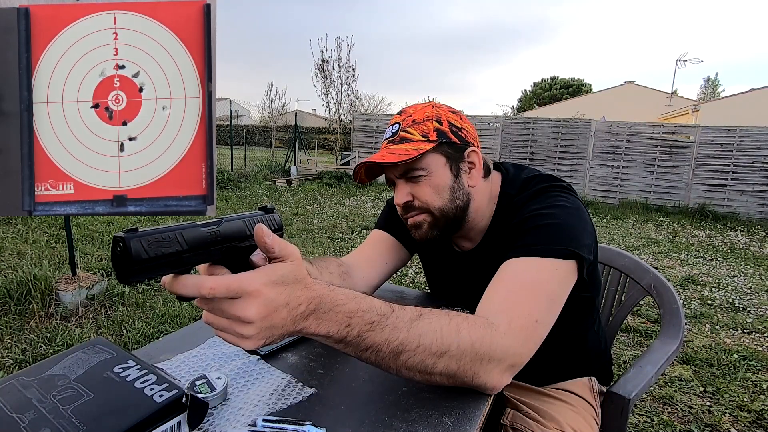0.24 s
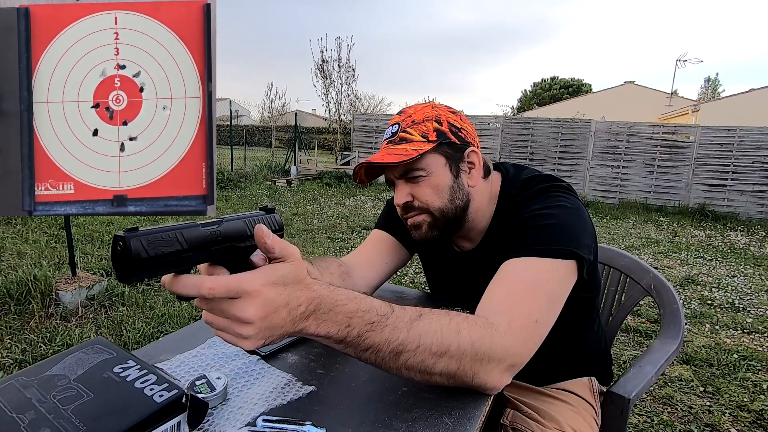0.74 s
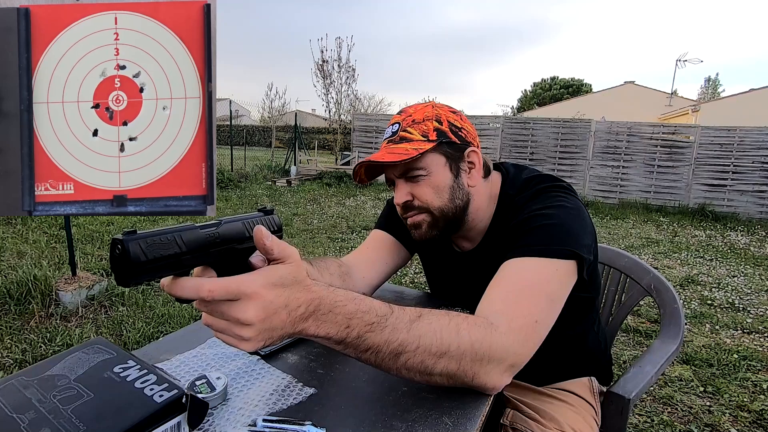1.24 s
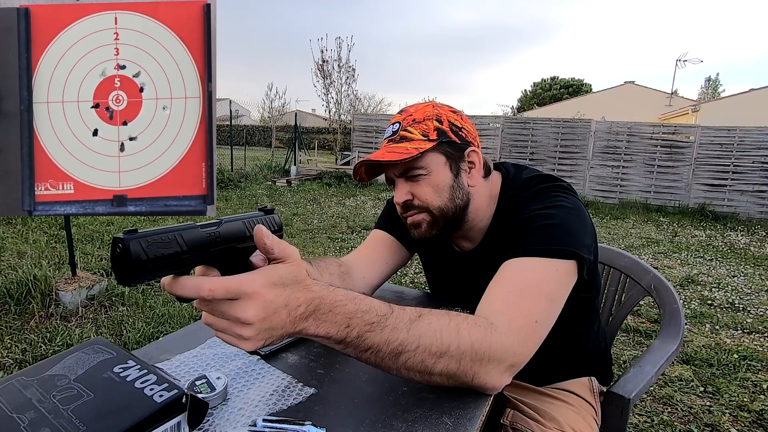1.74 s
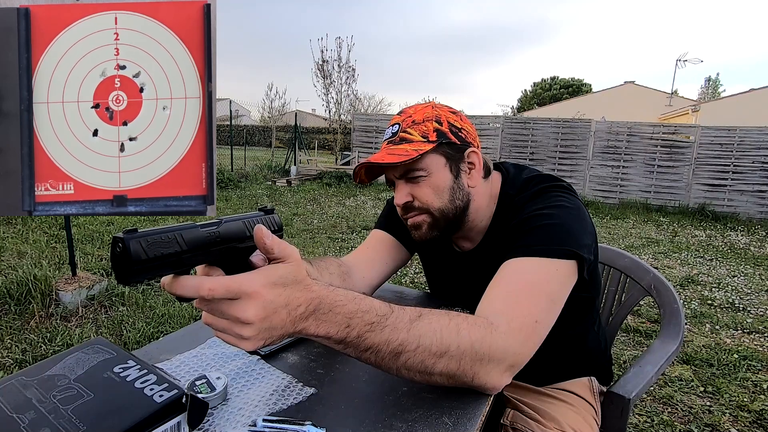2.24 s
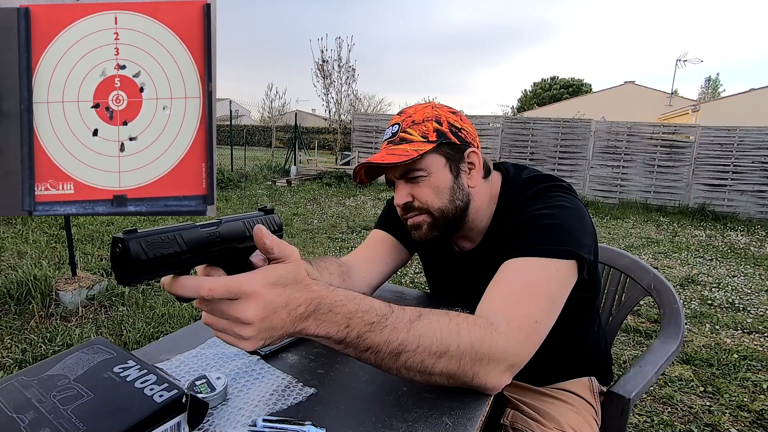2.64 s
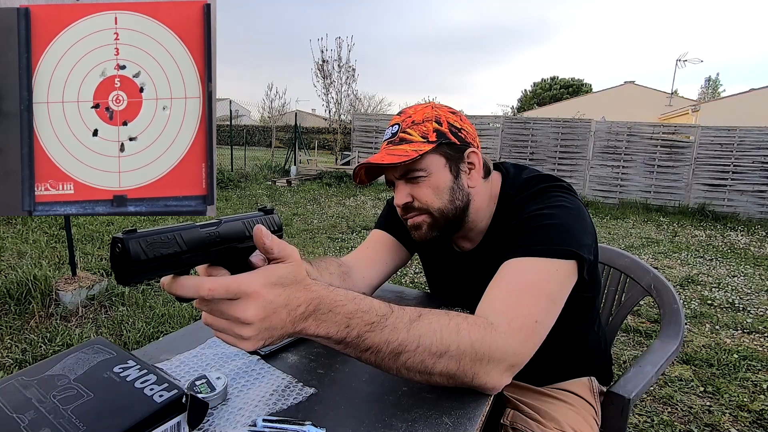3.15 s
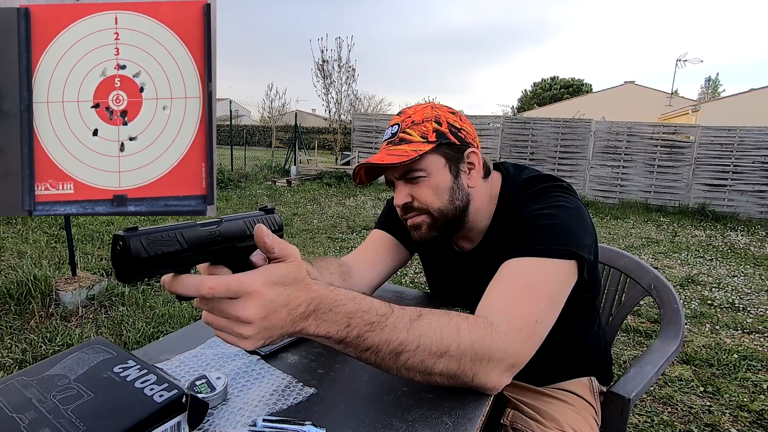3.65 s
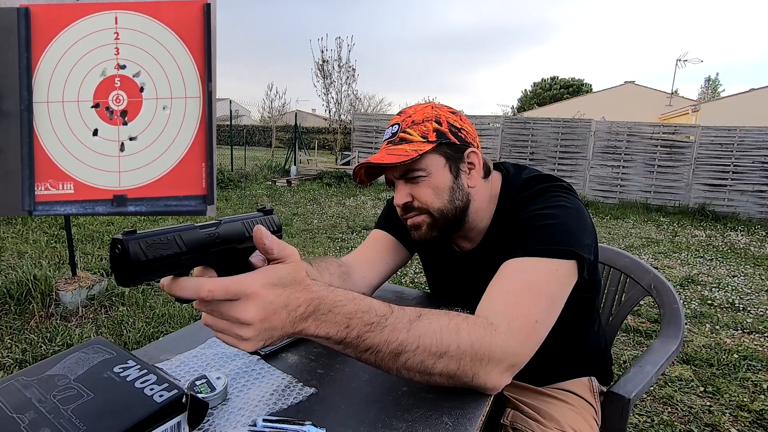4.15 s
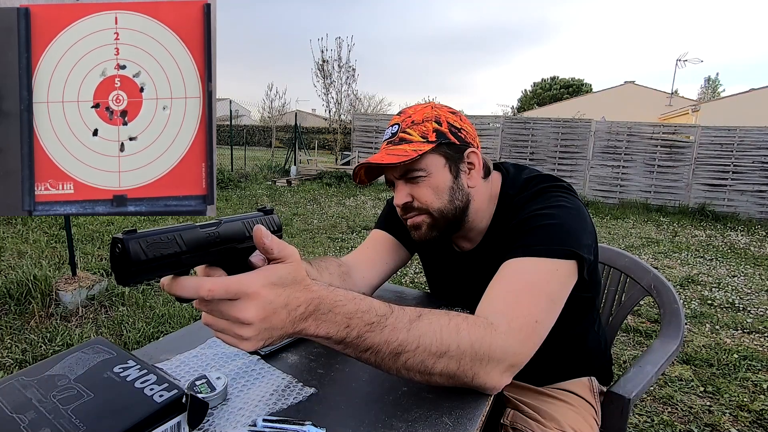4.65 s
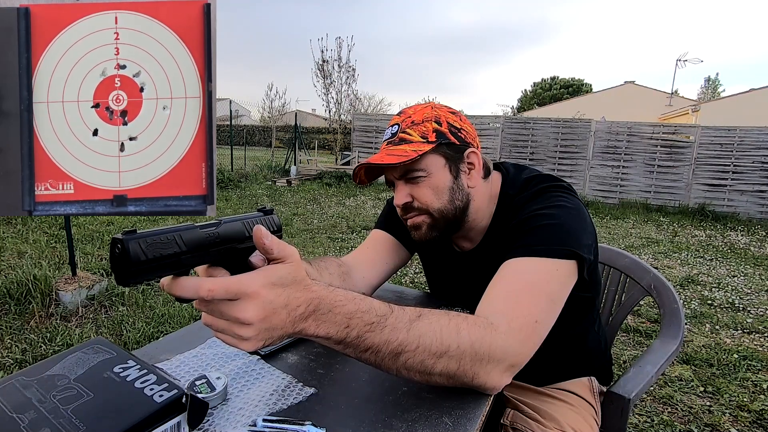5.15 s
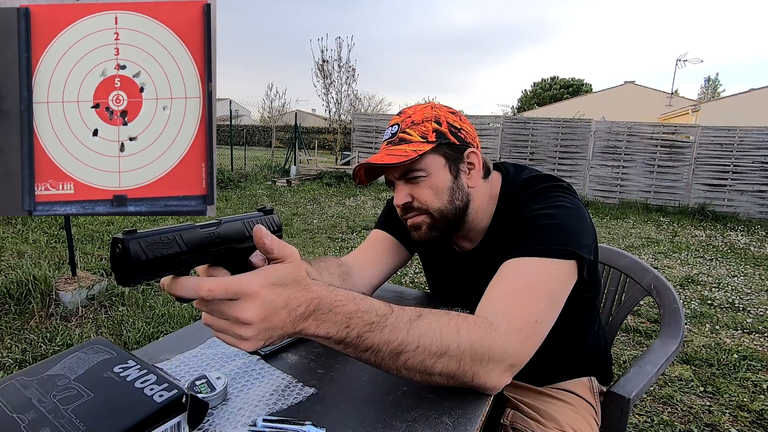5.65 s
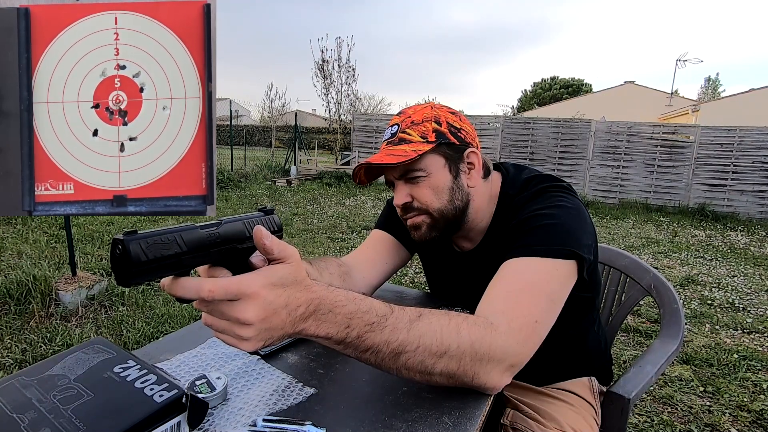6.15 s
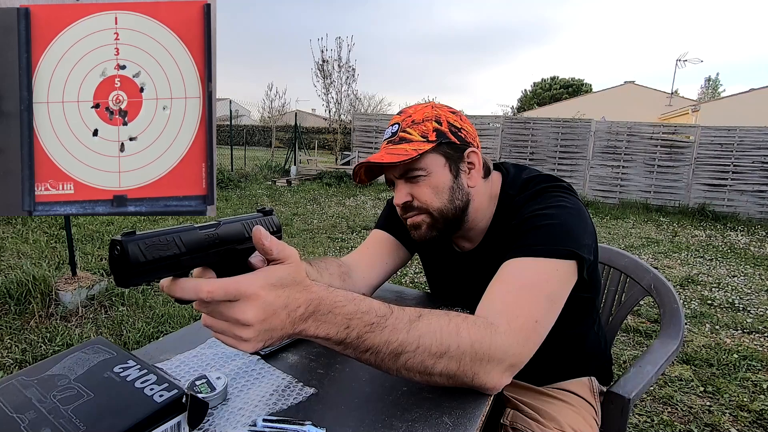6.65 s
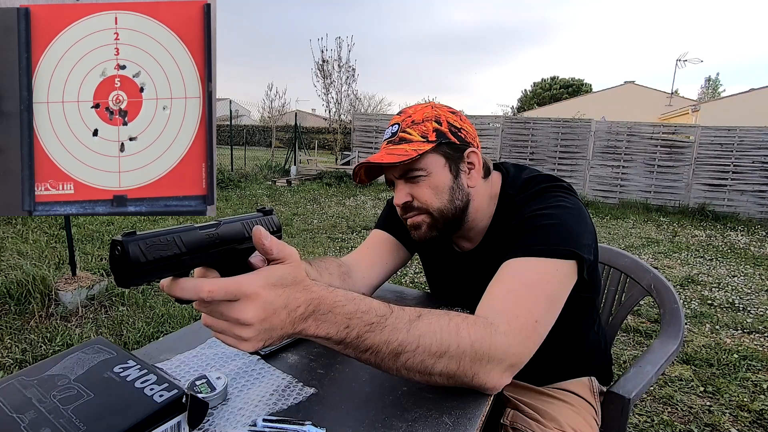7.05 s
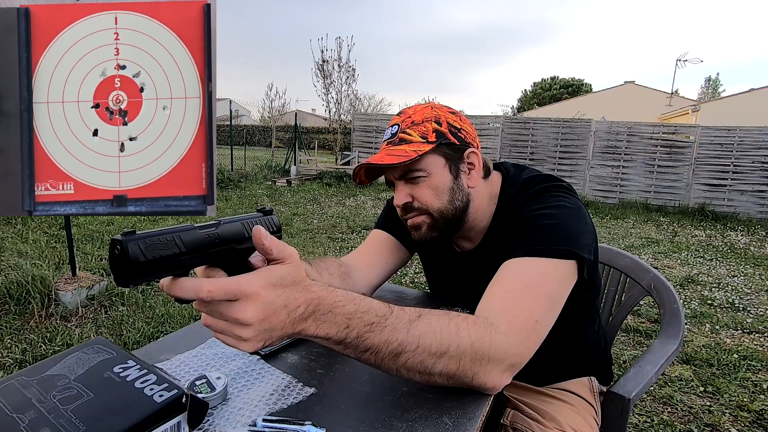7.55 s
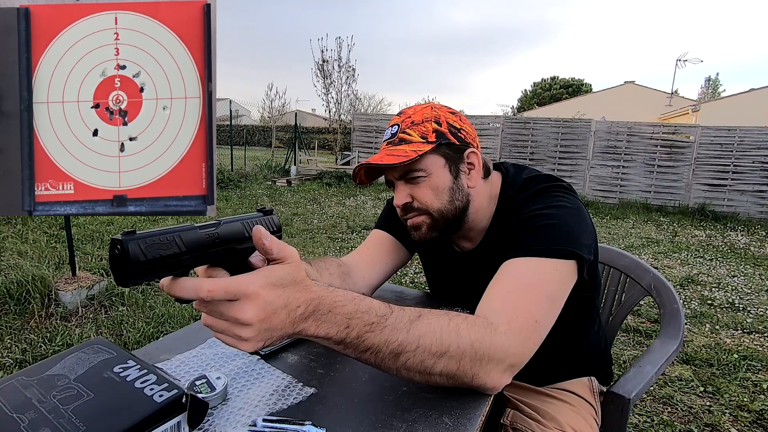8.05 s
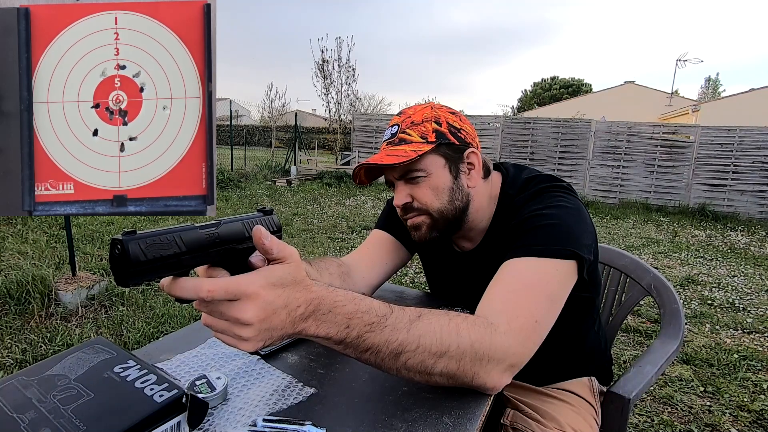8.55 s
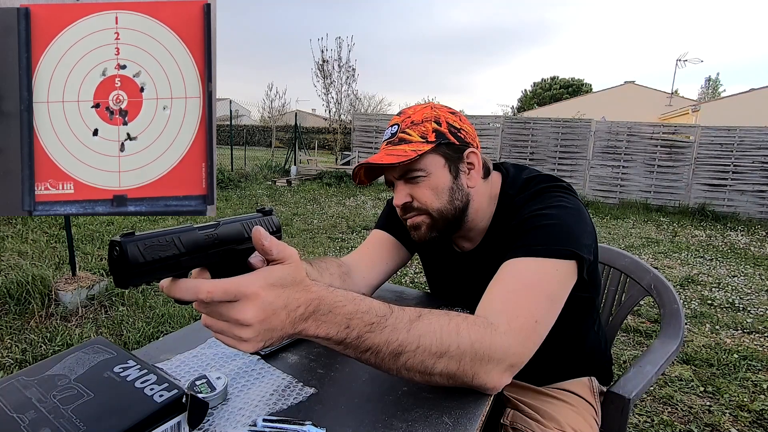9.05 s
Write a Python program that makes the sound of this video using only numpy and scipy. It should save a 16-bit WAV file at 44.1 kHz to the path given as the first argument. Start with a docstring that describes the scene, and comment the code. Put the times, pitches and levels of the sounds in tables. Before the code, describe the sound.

Close stereo microphone in an open garden. Low wind buffets at the start, then a gas pellet pistol fires four single shots about three seconds apart. Each is a hard, dry crack, followed at once by a short metallic ping from the target trap, a brief garden echo, and a bright steel trigger click. Dull ticks come between shots, over faint traffic and small birds.

```python
"""Wind on the microphone ports, far traffic and small birds lie under the whole scene: shaped noise, whistled glides.
Dull ticks of noise come as a trigger is taken up; four times a gas pistol then fires in an open garden.
Faint noise bursts and hiss, growing in 10 ms steps, come before each crack of suction spikes, gas noise and low push;
then the pellet sets the modes of a metal trap ringing, while banded noise swells and fades as the garden's return.
The trigger clicks back in bright steel modes, and a gain control ducks loud sounds and creeps back up."""
import sys
import numpy as np
from scipy import signal
from scipy.fft import rfft, irfft, next_fast_len
from scipy.io import wavfile
from scipy.ndimage import uniform_filter1d, minimum_filter1d

SR = 44100
rng = np.random.default_rng(int(sys.argv[2]) if len(sys.argv) > 2 else 0)


def output_pcm(signal):
    """Save a mono or channel-first signal as 16-bit PCM at the path in sys.argv[1].

    Samples are clipped to [-1, 1] before scaling.
    """
    pcm = np.clip(np.atleast_2d(signal).T, -1, 1) * 32767
    wavfile.write(sys.argv[1], SR, np.round(pcm).astype(np.int16))


def nominal_scale(level):
    """Amplitude ratio for a level in decibels (scalar or array-like)."""
    x = np.asarray(level, float) / 20
    return 10 ** x


N = 409688
TIME = np.arange(N) / SR
LEAD_S = .02   # short sounds begin this far into their buffer
SHORT_TIME = np.arange(4096) / SR - LEAD_S   # time in that buffer, zero at the start of the sound
LEAD, HALF_SECOND, HISS_SIZE, TAIL_SIZE = round(LEAD_S * SR), SR // 2, 2400, 33000   # lengths in samples

# The four shots. Each row: start of the crack in seconds, then the levels in dB of the low push, the early bursts,
# the hiss before the crack and the trap.
SHOTS = [(0.6542, -16.5, -13.5, -33, -25.5), (3.5945, -21.5, -8.5, -32, -24), (6.1055, -9, -18, -17.5, -21),
         (8.7847, -21.5, -7, -35, -22.5)]
# Spectrum of the crack. Each row: frequency in Hz, density in dB per Hz.
CRACK_SPECTRUM = [(180, -30.5), (300, -4.5), (688, -15), (1230, 1.5), (1690, -6), (2600, -7), (3280, 0),
                  (7280, -17), (9650, -14), (15900, -48)]
# Muzzle spike and its nearest reflections. Each row: time in seconds, level in dB.
CRACK_SPIKES = [(.0006, -1.5), (.0022, -4), (.0031, -5.5)]
# Returns of the crack from table, fence and walls. Each row: delay in seconds, level in dB.
ECHOES = [(.0100, -20.5), (0.0279, -26), (0.0335, -25), (.1780, -36)]
# Spectrum of the noise bursts and hiss before the crack. Each row: frequency in Hz, density in dB per Hz.
EARLY_BURST_SPECTRUM = [(150, -25), (330, 0.5), (800, -2.5), (1430, -13.5), (3120, -8.5), (4570, -17),
                        (5220, -8), (10100, -22.5), (15900, -43)]
# Thin tones in the hiss before the crack. Each row: frequency in Hz, level in dB.
HISS_TONES = [(800, 0.5), (1920, -5), (3050, -1), (4170, -7), (5300, -2), (5770, -5)]
# Modes of the metal trap. Each row: frequency in Hz, level in dB, time to fall 60 dB in seconds.
TRAP_MODES = [(526, -14, 0.23), (743, -14, 0.45), (1360, -10, 0.2), (1400, -16, .13), (2140, -18, 0.5),
              (3378, -10, 0.42), (3505, -9, 0.2), (4226, -3, 0.06), (4570, -4, 0.07), (4918, -18, .25),
              (6560, -14, 0.043)]
# Spectrum of the pellet's slap and the trigger's snap. Each row: frequency in Hz, density in dB per Hz.
SNAP_SPECTRUM = [(300, -45), (2800, -10.5), (3730, -11.5), (4420, 1), (5160, -15), (5750, -10),
                 (10500, -20), (15900, -43)]
# Spectrum of the garden's return. Each row: frequency in Hz, density in dB per Hz.
GARDEN_SPECTRUM = [(200, -17), (363, -40.5), (521, -9), (659, -13.5), (748, -8), (1150, -6.5), (3470, -7),
                   (9050, -23), (15000, -58)]
# Trigger springing back. Each row: start in seconds, level in dB, delay of its rebound in seconds.
RESETS = [(0.9249, -3, .0578), (3.8786, -3.5, .06), (6.425, -3, .0492), (9.1036, -2.5, .0545)]
# Modes of the trigger steel. Each row: frequency in Hz, level in dB, time to fall 60 dB in seconds.
STEEL_MODES = [(1050, -19, 0.045), (2800, -5, 0.05), (3623, -8, .04), (4500, 1, .032), (5850, -6, 0.035),
               (6632, -6, .04), (8350, -10, 0.028)]
# Spectrum of the rebound. Each row: frequency in Hz, density in dB per Hz.
REBOUND_SPECTRUM = [(900, -28), (2300, -5), (6000, 0), (14000, -24)]
# Trigger taken up. Each row: start in seconds, level in dB.
TICKS = [(0.016, -22.5), (1.346, -45), (3.231, -22), (4.203, -45), (4.681, -23.5), (4.96, -19),
         (6.745, -44), (6.889, -44.5), (7.293, -40), (7.304, -41), (7.901, -24)]
# Spectrum of the ticks in the frame. Each row: frequency in Hz, density in dB per Hz.
FRAME_SPECTRUM = [(130, -45), (280, -4), (613, -22), (1290, 1), (2170, -5.5), (2850, -2.5), (5550, -17.5),
                  (15000, -75)]
# Pistol and trigger at the two ports. Each row: frequency in Hz, left over right in dB.
NEAR_BALANCE = [(250, 0.5), (500, -3), (1500, 5), (4000, 1.5), (9000, -4)]
# Steep falling chirps. Each row: start in seconds, top pitch in Hz, level in dB.
CHIRPS = [(0.295, 5120, -69.5), (0.485, 5050, -66), (.575, 4050, -68), (1.839, 4700, -71),
          (3.04, 3520, -67), (4.885, 4420, -68), (5.54, 4650, -67), (7.61, 4450, -73), (8.42, 4600, -71.5),
          (8.51, 3700, -67.5)]
# Whistled glides. Each row: start in seconds, length in seconds, start and end pitch in Hz, level in dB.
GLIDES = [(0.333, 0.031, 3500, 3470, -60), (0.518, 0.049, 3420, 3490, -60), (2.247, 0.067, 2760, 2720, -69),
          (2.44, 0.068, 2100, 2050, -63.5), (5.027, 0.2, 2450, 1800, -68.5),
          (7.145, 0.094, 2380, 1800, -57.5), (7.80, 0.21, 2160, 1980, -69), (8.26, .045, 2220, 2400, -67.5)]
# Arched whistles. Each row: start in seconds, length in seconds, top pitch in Hz, drop at both ends in Hz,
# level in dB.
ARCHES = [(5.264, 0.097, 4280, 902, -68), (5.591, 0.082, 4480, 905, -69.5), (6.857, 0.16, 1885, 150.7, -62),
          (7.084, 0.092, 2680, 180, -68), (7.389, .1, 3550, 603, -69.5)]
# One wavering call. Its row: start in seconds, length in seconds, start, middle and end pitch in Hz, level in dB.
TRILL = (7.35, 0.19, 2180, 2080, 1930, -60)
# Background levels over time. Each row: time in seconds, far traffic in dB, far bird chorus in dB.
AIR_LEVELS = [(0, -60, -72), (1.2, -59.5, -67), (2.3, -58.5, -72), (3.3, -59, -77.5), (4.3, -57, -70.5),
              (5.3, -54.5, -65.5), (5.9, -58.5, -74.5), (7.4, -59.5, -78), (9.29, -59.5, -74)]
# Spectrum of the far traffic. Each row: frequency in Hz, density in dB per Hz.
TRAFFIC_SPECTRUM = [(110, -4), (168, 4), (258, -11.5), (379, -8.5), (740, -1.5), (1230, -1), (2350, -18),
                    (3670, -21), (6610, -42), (14000, -62.5)]
# Stereo width of the traffic. Each row: frequency in Hz, left-right likeness from -1 to 1.
TRAFFIC_LIKENESS = [(60, 0.75), (180, 0.57), (550, -0.13), (1650, 0.5), (4970, 0.16)]
# Far traffic at the two ports. Each row: frequency in Hz, left over right in dB.
ROAD_BALANCE = [(400, 0), (1300, -5.5), (4000, -0.5)]
# Gusts on the ports. Each row: time of the top in seconds, level there in dB, seconds to rise the last 20 dB,
# seconds to fall 20 dB.
GUSTS = [(.04, -21, 1.5, 0.16), (0.18, -21, 0.035, 0.09), (0.401, -37, 8, 0.84), (1.5, -48, 1.4, 0.69),
         (2.14, -56, 0.25, 0.78), (3.7, -41, 0.26, 0.04), (3.999, -29.5, 0.16, 0.1349),
         (4.29, -47, 0.1, 0.5), (5.6, -42, 0.32, 0.48), (6.12, -40, 0.28, 0.38), (7.95, -57.5, 0, .5)]
# Spectrum of the wind. Each row: frequency in Hz, density in dB per Hz.
GUST_SPECTRUM = [(20, 6.5), (50, 4.5), (100, -9), (180, -20), (300, -43), (800, -66)]

CRACK_DB = 4
EARLY_LEAD_S, EARLY_STEP_S, EARLY_STEP_DB = .0090, .0105, 11.5   # last burst before the crack, spacing, growth
HUM_DELAY_S, HUM_DB = .031, -12.5   # after the crack; against the trap level
TRAP_DELAY_S = .0635   # after the crack
GARDEN_DB = -21   # scattered sound against the trap level
NEAR_DB, NEAR_T60_S = 10, .22   # returns from near surfaces
SLAP_DB, SLAP_T60_S = 6, 0.24   # returns of the pellet's slap
FAR_DB, FAR_PEAK_S, FAR_SPREAD_S = -1.5, .2, .42   # far walls and hedges: 20 dB down one spread from the top
REBOUND_DB = -19   # against the snap level
PORT_LAG_S = .00002   # the right port hears pistol and trigger later
CHIRP_S, CHIRP_FALL = .048, .68   # length; end pitch against top pitch
TRILL_DEPTH = .035   # warble as a share of pitch
CALM_DB = -74   # wind between gusts
GUST_EDGE = 1.5   # a gust's dB fall grows with this power of time from its top
DUCK_FROM_DB, DUCK_SHARE, DUCK_HOLD_S = -31.5, 0.42, 0.45   # threshold, share of the excess taken off, hold
DUCK_ATTACK_S, DUCK_RELEASE_DB_PER_S = .15, 9


def pistol():
    """Each shot: a crack with a low push of gas, faint growing bursts and hiss before it, echoes, the trap."""
    out = np.zeros((2, N))
    push = swing(150, 0.0037) - nominal_scale(-7.5) * swing(45, .007)
    for s, push_db, early_db, hiss_db, trap_db in SHOTS:
        blast = nominal_scale(CRACK_DB) * crack()
        add(out, blast, s - LEAD_S)
        for after, level_db in ECHOES:
            echo = cut(blast[::-1], 6000, "low")   # duller, with the ports swapped
            add(out, nominal_scale(level_db) * echo, s - LEAD_S + after)
        add(out, nominal_scale(push_db) * push, s + 0.0025)
        for k in range(4):   # counted back from the crack, so each step in time is louder than the last
            before = EARLY_LEAD_S + k * EARLY_STEP_S
            level_db = early_db - k * EARLY_STEP_DB
            early_burst = burst(EARLY_BURST_SPECTRUM, .002, .0007, 2.5, .7, .0015)
            add(out, nominal_scale(level_db) * early_burst, s - LEAD_S - before)
            add(out, nominal_scale(level_db - 8.5) * push, s - before - .003)
        add(out, nominal_scale(hiss_db) * early_hiss(), s - HISS_SIZE / SR)
        hum = strike([(994, 0, .2)], 0.0033, 0.53, 0, size=HALF_SECOND)   # one mode near the muzzle
        add(out, nominal_scale(trap_db + HUM_DB) * hum, s + HUM_DELAY_S)
        add(out, nominal_scale(trap_db) * trap(), s + TRAP_DELAY_S)
        slap = burst(SNAP_SPECTRUM, 0.002, 0.0074, 0.83, 0.54)   # the pellet on the card
        add(out, nominal_scale(trap_db - 1.0) * slap, s - LEAD_S + TRAP_DELAY_S)
    return out


def crack():
    """Gas noise under three sharp spikes of suction; peak 1."""
    t = SHORT_TIME
    spikes = np.zeros_like(t)
    for s, level_db in CRACK_SPIKES:
        spikes[LEAD + round(s * SR)] = -nominal_scale(level_db)
    spikes = colour(spikes, CRACK_SPECTRUM)
    spikes = spikes * np.exp(np.minimum(t, 0) / 0.00025) * np.exp(-np.maximum(t - .0035, 0) / 0.00093)
    gas = burst(CRACK_SPECTRUM, 0.0038, 0.00039, spiky_db=3.5, alike=0.5)
    x = spikes / np.abs(spikes).max() + nominal_scale(-2.5) * gas
    return x / np.abs(x).max()


def swing(hz, peak_s):
    """A slow lobe of pressure: suction, then a hump."""
    t = SHORT_TIME + LEAD_S
    return -np.sin(2 * np.pi * hz * t)[None] * (t / peak_s) * np.exp(1 - t / peak_s)


def early_hiss():
    """Hiss with thin tones in it, growing up to the crack."""
    hz, level_db = np.transpose(HISS_TONES)
    t = np.arange(HISS_SIZE) / SR
    turns = hz[:, None] * t + rng.random((2, len(hz), 1))   # each port has its own phases
    tones = (nominal_scale(level_db)[:, None] * np.sin(2 * np.pi * turns)).sum(axis=1)
    hiss = colour(pair(.7, size=HISS_SIZE), EARLY_BURST_SPECTRUM)
    growth = np.exp(-(t[::-1] / 0.019) ** 2)
    return (rms_one(hiss) + nominal_scale(1.5) * rms_one(tones)) * growth


def trap():
    """The pellet's short contact rings the sheet's modes, over a longer rough excitation of the same modes."""
    blow = strike(TRAP_MODES, .004, .6, 1.5, size=HALF_SECOND)
    returned = strike(TRAP_MODES, 0.24, 1.0, 1.5, size=HALF_SECOND)   # the garden returns the ring
    return blow + nominal_scale(-9.5) * returned


def garden():
    """Scattered, grainy returns of each shot from near and far surfaces, the treble dying first."""
    out, t = np.zeros((2, N)), np.arange(TAIL_SIZE) / SR
    slap_t = t - TRAP_DELAY_S
    near = nominal_scale(NEAR_DB - 60 * t / NEAR_T60_S)
    slap = (slap_t > 0) * nominal_scale(SLAP_DB - 60 * np.abs(slap_t) / SLAP_T60_S)
    far = nominal_scale(FAR_DB - 20 * ((t - FAR_PEAK_S) / FAR_SPREAD_S) ** 2)
    shape = np.sqrt(near ** 2 + slap ** 2 + far ** 2)
    # the same surfaces give every shot the same fine spectral peaks
    ripple = rms_one(nominal_scale(2.5 * drift(600, size=TAIL_SIZE // 2 + 1)))
    likeness = [(300, 0.4), (4000, 0.24), (9000, 0.09)]   # left-right, by Hz
    for s, *_, trap_db in SHOTS:
        noise = banded(GARDEN_SPECTRUM, likeness, 1.5 - 14 * t, 1700, 3.2, 180, count=13, size=TAIL_SIZE)
        noise = irfft(rfft(noise) * ripple, len(t))
        grain_db = 2.2 * drift(160.0, size=TAIL_SIZE)
        add(out, nominal_scale(trap_db + GARDEN_DB + grain_db) * shape * noise, s + 0.0044)
    return out


def trigger():
    """Bright steel snaps as it springs back, a dry tap as it rebounds, dull ticks in the frame as it is taken up."""
    out = np.zeros((2, N))
    for s, level_db, rebound_s in RESETS:
        snap = burst(SNAP_SPECTRUM, 0.002, 0.0031, 0.5, 0.32)
        snap[:, LEAD:] += nominal_scale(-5.5) * strike(STEEL_MODES, 0.003, 0.58, 2.0, size=len(SHORT_TIME) - LEAD)
        snap = cut(snap, 900, "high")   # small parts carry no bass
        add(out, nominal_scale(level_db) * snap, s - LEAD_S)
        add(out, nominal_scale(level_db - 26) * snap[::-1], s + .007)   # return from the fence
        rebound = burst(REBOUND_SPECTRUM, .001, .0018, 1.5, .6)
        add(out, nominal_scale(level_db + REBOUND_DB) * rebound, s + rebound_s - LEAD_S)
    for s, level_db in TICKS:
        tick = nominal_scale(level_db) * burst(FRAME_SPECTRUM, 0.0012, 0.0024, 1.0, 1.0, 0.0015)
        add(out, tick, s - LEAD_S)
        add(out, nominal_scale(-15) * tick, s - LEAD_S - .0028)   # first touch
    return out


def birds(chorus_db):
    """Near notes one by one over a far chorus of steep sweeps; the garden blurs them all."""
    near, far = np.zeros((2, N)), np.zeros((2, N))
    for s, hz, level_db in CHIRPS:
        chirp = note(CHIRP_S, hz, hz * np.sqrt(CHIRP_FALL), hz * CHIRP_FALL)
        add(near, nominal_scale(level_db) * chirp, s)
    for s, length_s, start_hz, end_hz, level_db in GLIDES:
        glide = note(length_s, start_hz, np.sqrt(start_hz * end_hz), end_hz)
        add(near, nominal_scale(level_db) * glide, s)
    for s, length_s, hz, drop_hz, level_db in ARCHES:
        add(near, nominal_scale(level_db) * note(length_s, hz - drop_hz, hz, hz - drop_hz), s)
    add(near, nominal_scale(TRILL[-1]) * note(*TRILL[1:-1], TRILL_DEPTH), TRILL[0])
    for when, pitch, long, falling, close in rng.random((600, 5)):
        hz = 2600 + 1500 * pitch
        sweep_hz = 700 * long * np.sign(falling - .3)   # most fall, some rise
        chirp = note(.025 + .03 * long, hz + sweep_hz, hz, hz - sweep_hz)
        add(far, nominal_scale(6 * close ** 2) * chirp, when * N / SR)
    blur = rng.standard_normal((2, 6000)) * np.exp(-np.arange(6000) / (0.04 * SR))
    blur[:, 0] = 20   # direct sound
    blur = blur / np.linalg.norm(blur[0])
    near, far = (signal.fftconvolve(x, blur, axes=1)[:, :N] for x in (near, far))
    return near + nominal_scale(chorus_db) * rms_one(far)


def note(length_s, start_hz, middle_hz, end_hz, warble=.004):
    """A whistled glide through three pitches, a little unsteady in pitch and level."""
    u = np.linspace(0, 1, round(length_s * SR))
    hz = np.polyval(np.polyfit([0, .5, 1], [start_hz, middle_hz, end_hz], 2), u)
    hz = hz * (1 + warble * np.sin(2 * np.pi * 36 * length_s * u))   # 36 Hz warble
    waver = nominal_scale(4.5 * np.stack([drift(60, len(u)) for port in "LR"]))
    tone = np.sqrt(2) * np.sin(2 * np.pi * np.cumsum(hz) / SR)
    return tone * np.sin(np.pi * u) ** .5 * waver


def far_traffic(traffic_db):
    """A far road: banded noise whose level drifts slowly, coloured differently at each port."""
    road = banded(TRAFFIC_SPECTRUM, TRAFFIC_LIKENESS, 0, 1000, 1.0, 120, count=14)
    return ports(nominal_scale(traffic_db) * road, ROAD_BALANCE)


def wind():
    """Low turbulence on the ports: nearly unlike left and right, brighter in the stronger gusts."""
    wind_db = wind_level()
    bright_db = .15 * (wind_db + 48.5)   # stronger gusts reach higher; dB per octave
    lumps = nominal_scale(3.0 * drift(18.0))   # eddies hit all bands at once
    noise = banded(GUST_SPECTRUM, [(30, 0.12), (300, 0.11)], bright_db, 52, 2.9, 26, count=11)
    return nominal_scale(wind_db) * lumps * noise


def wind_level():
    """Gusts add up in power over a calm; dB."""
    power = nominal_scale(CALM_DB) ** 2
    for s, peak_db, rise_s, fall_s in GUSTS:
        away = np.where(TIME < s, (s - TIME) / rise_s, (TIME - s) / fall_s)
        power = power + nominal_scale(peak_db - 20 * away ** GUST_EDGE) ** 2
    return 10 * np.log10(power)


def strike(modes, contact_s, alike, spread_db, size):
    """A rough, fading contact sets every mode ringing with a strength of its own; peak 1."""
    contact = pair(alike, size) * np.exp(-np.arange(size) / (contact_s * SR)) + 1e-18
    contact[:, 0] += np.sqrt(contact_s * SR)   # the first touch is a firm blow
    out = 0
    for hz, level_db, t60 in modes:
        r, w = nominal_scale(-60 / (t60 * SR)), 2 * np.pi * hz / SR
        gain = nominal_scale(level_db + spread_db * rng.standard_normal())
        out = out + gain * signal.lfilter([0, np.sin(w)], [1, -2 * r * np.cos(w), r * r], contact)
    return out / np.abs(out).max()


def burst(spectrum, length_s, fall_s, spiky_db, alike, rise_s=0.00023):
    """A few ms of spiky noise with a sudden start; peak 1."""
    t = SHORT_TIME
    shape = (t > 0) * np.exp(-np.maximum(t - length_s, 0) / fall_s)
    spikes = nominal_scale(spiky_db * rng.exponential(1, len(t)))
    x = colour(pair(alike, len(t)) * spikes * shape, spectrum)
    x = x * np.exp(np.minimum(t, 0) / rise_s)   # steep onset
    return x / np.abs(x).max()


def banded(spectrum, likeness, tilt_db, pivot_hz, patchy_db, lowest_hz, count, size=N):
    """Half-octave bands of stereo noise, each with its own level, flicker and likeness; tilt per octave."""
    out, power, white = 0, 0, rng.standard_normal((2, 2, size))
    for k in range(count):
        low = lowest_hz * 2 ** (k / 2)
        hz = low * 2 ** .25   # band centre
        sos = signal.butter(2, [low, low * np.sqrt(2)], "band", fs=SR, output="sos")
        mid, side = signal.sosfilt(sos, white[k % 2])   # neighbouring bands use separate noise
        alike = np.clip(at_hz(likeness, hz), -1, 1)
        stereo = np.sqrt(1 + alike) * mid + np.sqrt(1 - alike) * side * [[1], [-1]]
        band = nominal_scale(at_hz(spectrum, hz)) * stereo
        power += np.mean(band ** 2)
        octaves = max(np.log2(hz / pivot_hz), 0)
        out = out + band * nominal_scale(tilt_db * octaves + patchy_db * drift(27.0, size))
    return out / np.sqrt(power)


def pair(alike, size):
    """Two noises that share a part."""
    mid, side = rng.standard_normal((2, size))
    alike = np.clip(alike, 0, 1)
    return np.sqrt(1 + alike) * mid + np.sqrt(1 - alike) * side * [[1], [-1]]


def drift(rate, size=N):
    """Slow random wander of spread 1: noise through two equal low-pass poles at rate Hz."""
    r = np.exp(-80 * np.pi * rate / SR)   # computed at every 40th sample
    slow = signal.lfilter([1], [1, -2 * r, r * r], rng.standard_normal(size // 40 + 2002))[2000:]
    return np.interp(np.arange(size) / 40, np.arange(len(slow)), rms_one(slow))


def ports(x, balance, lag_s=0):
    """A source reaches the two ports with its own colour and time."""
    size = next_fast_len(N)
    hz = np.maximum(np.fft.rfftfreq(size, 1 / SR), 1)
    half = nominal_scale(at_hz(balance, hz) / 2) * np.exp(1j * np.pi * hz * lag_s)
    return irfft(rfft(x, size) * [half, 1 / half], size)[:, :N]


def colour(x, spectrum):
    """Shape a short sound by a spectrum."""
    hz = np.maximum(np.fft.rfftfreq(x.shape[-1], 1 / SR), 1)
    return irfft(rfft(x) * nominal_scale(at_hz(spectrum, hz)), x.shape[-1])


def at_hz(points, hz):
    """A spectrum read on a log-frequency axis."""
    points = np.array(points)
    return np.interp(np.log(hz), np.log(points[:, 0]), points[:, 1])


def in_time(rows, t=TIME):
    """Columns of a curve table read at times t."""
    s, *columns = np.transpose(rows)
    return [np.interp(t, s, c) for c in columns]


def cut(x, hz, kind):
    """Two-pole low- or high-pass."""
    return signal.lfilter(*signal.butter(2, hz, kind, fs=SR), x)


def rms_one(x):
    """Scale to unit rms."""
    return x / np.sqrt(np.mean(x ** 2) + 1e-20)


def add(out, x, s):
    """Mix x into out from time s on."""
    i = round(s * SR)
    x, i = x[:, max(-i, 0):], max(i, 0)
    out[:, i:i + x.shape[-1]] += x[:, :N - i]


def scene():
    """All sources at the microphone."""
    traffic_db, chorus_db = in_time(AIR_LEVELS)
    near = ports(pistol() + trigger(), NEAR_BALANCE, PORT_LAG_S)
    return near + garden() + birds(chorus_db) + far_traffic(traffic_db) + wind()


def gain_control(x):
    """Loud sounds turn the gain down; it holds, then creeps back. Wind rumble is kept out of the detector."""
    heard = cut(x.mean(axis=0), 300, "high")
    level_db = 10 * np.log10(uniform_filter1d(heard ** 2, size=LEAD) + 1e-10)
    cut_db = DUCK_SHARE * np.maximum(level_db - DUCK_FROM_DB, 0)
    hold = round(DUCK_HOLD_S * SR) // 2 * 2 + 1
    held_db = -minimum_filter1d(-cut_db, hold, origin=hold // 2, mode="nearest")   # largest cut of the hold
    slope = DUCK_RELEASE_DB_PER_S * TIME
    released_db = np.maximum.accumulate(held_db + slope) - slope
    r = np.exp(-1 / (DUCK_ATTACK_S * SR))
    return x * nominal_scale(-signal.lfilter([1 - r], [1, -r], released_db))


def low_pass(x):
    """Removes everything above the highest recorded frequency."""
    return signal.sosfilt(signal.butter(12, 16040, fs=SR, output="sos"), x)


def record(dry):
    """Gain control, then overload at full scale."""
    mix = np.clip(gain_control(dry), -1, 1)
    return low_pass(mix)


dry = scene()
out = record(dry)
output_pcm(out)
```